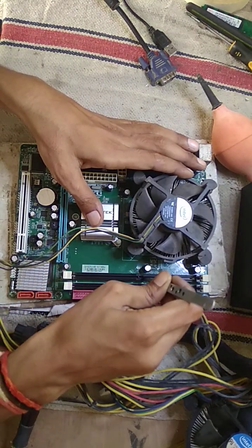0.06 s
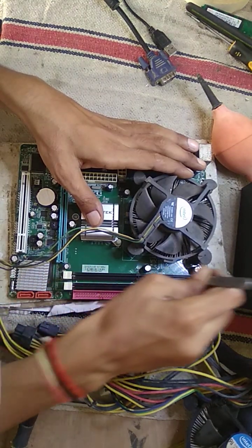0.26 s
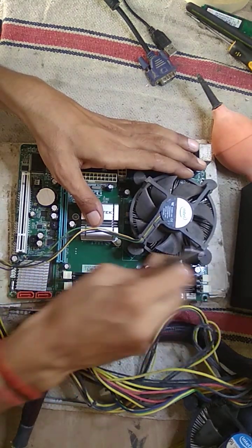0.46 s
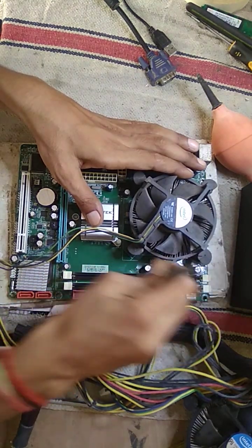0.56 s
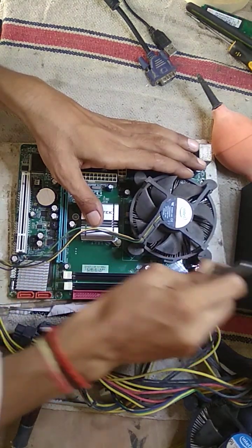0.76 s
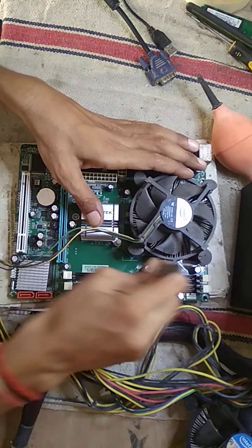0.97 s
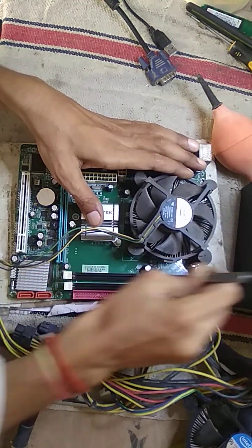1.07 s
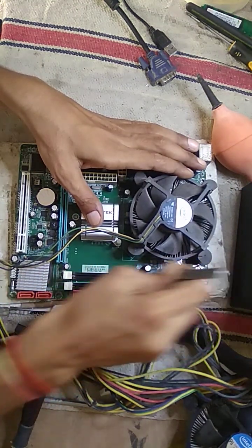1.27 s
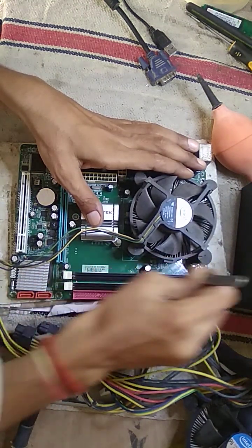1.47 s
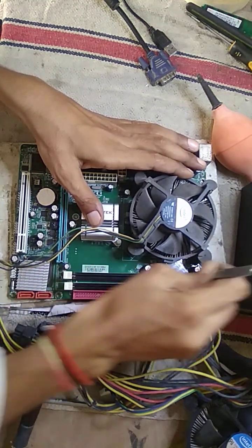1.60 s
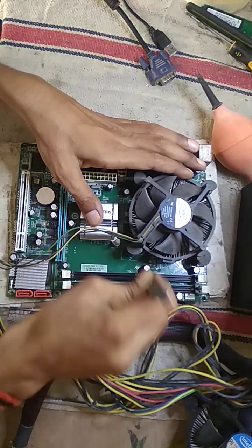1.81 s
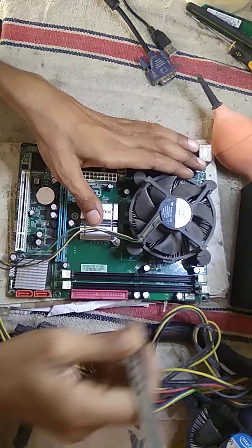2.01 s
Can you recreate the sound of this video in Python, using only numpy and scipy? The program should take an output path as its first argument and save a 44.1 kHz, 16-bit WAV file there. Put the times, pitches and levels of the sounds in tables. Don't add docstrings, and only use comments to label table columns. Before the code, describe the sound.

Faint touches, then quick alternating scrapes of metal on a plastic board slot, hissy and ticking, the board rattling on cloth; strokes stop and soft rumble remains. Small room, handheld stereo microphone above.

```python
import sys
import numpy as np
from scipy import signal
from scipy.fft import rfft, irfft
from scipy.io import wavfile

SR = 44100
rng = np.random.default_rng(int(sys.argv[2]) if len(sys.argv) > 2 else 0)


def field_ratio(decibels):
    return 10 ** (np.asarray(decibels, dtype=float) / 20)


def to_wav(s):
    ch = np.atleast_2d(s).T
    pcm = np.round(np.clip(ch, -1, 1) * 32767)
    wavfile.write(sys.argv[1], SR, pcm.astype(np.int16))


N = 90404


def at_hz(points, hz):
    p = np.array(points, float)
    return np.interp(np.log(np.maximum(hz, 1)), np.log(p[:, 0]), p[:, 1])


def over_time(points):
    return np.interp(np.arange(N) / SR, *np.transpose(points))


def rms_one(x):
    return x / np.sqrt(np.mean(x ** 2) + 1e-20)


def cut(x, hz, kind, order=4):
    return signal.sosfilt(signal.butter(order, hz, kind, fs=SR, output="sos"), x)


def colour(x, points):
    hz = np.fft.rfftfreq(N, 1 / SR)
    inside = (hz > points[0][0]) * (hz < points[-1][0])
    return irfft(rfft(x) * field_ratio(at_hz(points, hz)) * inside, N)


def drift(rate):
    r = np.exp(-2 * np.pi * rate / SR)
    return rms_one(signal.lfilter([1], [1, -2 * r, r * r], rng.standard_normal(N + SR))[SR:])


def ring(clicks, hz, t60):
    r, w = field_ratio(-60 / (t60 * SR)), 2 * np.pi * hz / SR
    return signal.lfilter([0, np.sin(w)], [1, -2 * r * np.cos(w), r * r], clicks + 1e-18)


def random_signs():
    return rng.choice([-1, 1], N)


def grains(rate, spread_db, clump_db):
    uneven = spread_db * np.minimum(rng.exponential(1, N), 3)
    size = field_ratio(uneven + clump_db * drift(90))
    return rms_one(size * random_signs() * (rng.random(N) < rate / SR))


def bumps():
    return grains(2000, 1, 1.5)


def pair_noise(spectrum, db):
    mid, side = colour(rng.standard_normal((2, N)), spectrum)
    pair = mid * field_ratio([[1.2], [-1.2]]) + 0.19 * side * [[1], [-1]]
    return field_ratio(db + 4 * drift(6.9)) * rms_one(pair)


# (t/s, level/dB)
ARM_LEVEL = [(0, -71.5), (.08, -62.5), (.11, -77), (.22, -66), (.35, -67.5), (.5, -67), (.9, -63),
             (1.02, -65.5), (1.44, -61.5), (1.53, -65.5), (1.72, -57), (1.83, -57.5), (2.01, -73),
             (2.05, -64.5)]
# (f/Hz, level/dB per Hz)
ARM_COLOUR = [(15, 11.5), (32, 5), (85, -0.5), (122, 5), (160, -10), (230, -18.5)]


def arm_rumble():
    return pair_noise(ARM_COLOUR, over_time(ARM_LEVEL))


# (f/Hz, level/dB per Hz)
AIR_COLOUR = [(150, -9), (250, -14.5), (390, -10), (600, -25), (1000, -22), (2500, -38.5), (11000, -45.5),
              (14000, -65)]


def room_air():
    return pair_noise(AIR_COLOUR, -74.5)


def earlier_stroke():
    fade = field_ratio(-260 * np.arange(N) / SR)
    return field_ratio(-62) * rms_one(colour(rng.standard_normal(N), RASP)) * fade


# (t/s, peak level/dB, f/Hz, t60/s)
HANDLING = [
    (.051, -52, 390, .05),
    (.131, -60, 10700, .025),
    (.133, -63, 11300, .03),
    (.135, -58, 380, .05),
    (.185, -64, 700, .04),
    (.335, -56, 1000, .02),
    (2.03, -57, 520, .04),
]


def handling():
    out = 0
    for s, db, hz, t60 in HANDLING:
        click = field_ratio(db) * (np.arange(N) == int(s * SR))
        out = out + cut(ring(click, hz, t60), [.75 * hz, 1.3 * hz], "band", order=1)
    return out


# (t/s, scraping speed as level/dB, pressure on the board/dB)
PUSHES = [
    [(.216, -62, -2), (.226, -32, 6), (.234, -31.5, 2), (.244, -23.5, -2), (.252, -42, -9), (.27, -44, -11)],
    [(.62, -66, 5), (.63, -37, -0.5), (.65, -28, 3), (.66, -36, -7), (.684, -26.5, -1.5), (.708, -31, -2),
     (.72, -26, -2), (.756, -24.5, -2.5), (.81, -53, -15)],
    [(1.044, -61, 14.5), (1.056, -30, 7), (1.076, -25.5, 0.5), (1.1, -24.5, -4.5), (1.156, -29.5, -4),
     (1.21, -68.5, -12.5)],
    [(1.45, -56.5, 12.5), (1.464, -31, 5), (1.476, -24.5, -1), (1.502, -25, 2.5), (1.542, -29.5, -12.5),
     (1.61, -62, 6.5)],
]
# (t/s, scraping speed as level/dB, pressure on the board/dB)
PULLS = [
    [(.422, -68, -12), (.432, -44.5, -6.5), (.45, -49, -17), (.458, -42, -5), (.474, -39, 2),
     (.515, -43.5, 4.5), (.542, -40.5, 2), (.575, -65.5, -2)],
    [(.85, -58, 8), (.86, -30, -10.5), (.894, -25, -6), (.926, -35.5, 1), (.958, -47.5, 8), (.975, -60, 0)],
    [(1.257, -64, 6), (1.271, -42.5, -5), (1.345, -36.5, -3), (1.364, -33.5, -2), (1.381, -42, 4),
     (1.41, -67, -1.5)],
    [(1.677, -71.5, -0.5), (1.685, -31.5, -12.5), (1.691, -29.5, -6), (1.719, -37.5, 1.5), (1.749, -36, -8),
     (1.783, -38, 4.5), (1.805, -58.5, -2), (1.89, -64, -6.5), (1.96, -87, -6)],
]
LANDINGS = [.2245, .427, .629, .856, 1.0545, 1.266, 1.461, 1.685]


def hand():
    lift_rate, land_rate, land_s = 920.5, 8000, .002
    t = np.arange(N) / SR
    speed, press, pull = np.zeros((3, N))
    strokes = [rows for pair in zip(PUSHES, PULLS) for rows in pair]
    for k, rows in enumerate(strokes):
        s, db, press_db = np.transpose(rows)
        lift = lift_rate * np.maximum(t - s[-1], 0)
        landing = land_rate * np.maximum(LANDINGS[k] - t, 0)
        lean_in = lift_rate * np.maximum(s[0] - t, 0)
        speed += field_ratio(np.interp(np.maximum(t, LANDINGS[k] + land_s), s, db) - lift - landing)
        press += field_ratio(np.interp(t, s, db + press_db) - lift - lean_in)
        pull[t > s[0]] = k % 2
    return speed, press, pull


# (t/s, length/s, f/Hz, level/dB)
FLEXES = [(0.21, 0.054, 520, -48.5), (0.47, 0.094, 537, -56), (0.63, 0.1, 590, -50), (0.73, 0.05, 432, -52),
          (0.879, 0.07, 658, -43.5), (1.04, 0.15, 532, -46), (1.045, 0.15, 612, -51),
          (1.06, 0.12, 270, -53), (1.302, 0.088, 590, -51), (1.484, 0.12, 526, -49.5),
          (1.479, 0.045, 252, -53.5), (1.686, 0.11, 622, -46), (0.21, 0.1, 627, -60.5),
          (1.2, 0.14, 614, -55.5), (.63, .14, 250, -64), (.9, .13, 300, -64.5), (0.64, .1, 793, -53.5),
          (1.79, 0.056, 503, -63), (.32, 0.052, 330, -67.5)]


def flexes():
    t, shaking, out = np.arange(N) / SR, bumps(), 0
    for s, length, hz, db in FLEXES:
        swell = np.sqrt(np.sin(np.pi * np.clip((t - s) / length, 0, 1)).clip(0))
        tone = cut(ring(shaking * swell, hz, .075), [0.78 * hz, 1.19 * hz], "band", order=1)
        out = out + field_ratio(db) * tone / np.sqrt(np.sum(tone ** 2) / (length * SR))
    return out


# (f/Hz, level pushing/dB, level pulling/dB)
BOARD_MODES = [(720, -9.5, -34.5), (858, -0.5, 1), (1006, -1.5, 6), (1120, 0, 2), (1275, 1, 8.5),
               (1411, 4.5, 3), (1590, 8, 3.5), (1648, -7.5, -9.5), (1712, -4, 2), (1938, -1.5, 3.5),
               (2378, -3.5, -0.5), (2737, -10, -1.5)]
# (t/s, favoured f/Hz)
SPAN = [(0.2, 1370), (0.29, 1410), (0.326, 1190), (0.524, 1120), (0.618, 1440), (0.672, 1330), (0.74, 1545),
        (0.79, 1400), (0.83, 960), (0.866, 1170), (0.998, 1270), (1.024, 1540), (1.228, 1090),
        (1.516, 1520), (1.634, 1200), (1.674, 1510), (1.752, 1190), (1.82, 1171)]


def board(press, pull):
    cycles = 46
    shaking, span, out = bumps() * press, over_time(SPAN), 0
    for k, (hz, push_db, pull_db) in enumerate(BOARD_MODES):
        t60 = cycles / hz
        place_db = 2 * drift(18.7)
        off_span_db = 3.5 * np.log2(hz / span) ** 2
        strength = field_ratio(np.where(pull, pull_db, push_db) + place_db - off_span_db)
        out = out + (-1) ** k * ring(shaking * strength, hz, t60) / np.sqrt(t60 * SR)
    return field_ratio(-1) * cut(out, 905, "high")


# (brightening at its start/dB, at its end/dB)
EDGE_TILT = [(-3, 0), (3, -3.5), (-1, -1.5), (1.5, -1), (-2, -1), (3.5, 5.5), (0, 6.5), (2, 0.5)]


def edge():
    s = np.add.outer(LANDINGS, [0, 0.15]).ravel()
    return field_ratio(np.interp(np.arange(N) / SR, s, np.ravel(EDGE_TILT)))


def shimmer(x):
    t = np.arange(SR // 20) / SR
    trail = rng.standard_normal(len(t)) * field_ratio(-60 * t / 0.09)
    trail = field_ratio(-0.5) * trail / np.sqrt(np.sum(trail ** 2)) + (t == 0)
    x = signal.lfilter(*signal.iirnotch(4270, 8, fs=SR), x)
    return signal.fftconvolve(x, trail)[:N] / np.sqrt(np.sum(trail ** 2))


# (f/Hz, level/dB per Hz)
RASP = [(1060, -34.5), (1800, -2.5), (3640, -6.5), (4260, 1.5), (4940, -1.5), (7860, -3), (13300, -8.5),
        (16000, 0.5), (16500, -36)]
# (f/Hz, width/Hz, level/dB)
TOOL_MODES = [(3580, 35, -3.5), (5300, 64, -29.5), (7190, 150, -2), (11140, 1300, 16.5), (10500, 92, -21),
              (13400, 200, 15.5), (15250, 600, -2)]


def tool(speed, pull):
    rasp_db, ring_db = -4, -2.5
    edge_hz, dull_hz, pull_dull_db = 7800, 4500, -1.5

    def patch(hz, db=0):
        return field_ratio(3.5 * drift(16.3) + db) * (edge() if hz > edge_hz else 1)

    bands = np.geomspace(1000, 17000, 25)
    patches = [patch(low, pull_dull_db * pull * (low < dull_hz)) for low in bands[:-1]]
    swells = [patch(mode[0]) for mode in TOOL_MODES]
    parts = []
    for _ in range(3):
        ticks = grains(3300, 5.5, 1.2)
        hiss, rasp, rings = rms_one(colour(ticks, RASP)), 0, 0
        for gain, low, high in zip(patches, bands, bands[1:]):
            rasp = rasp + gain * cut(hiss, [low, high], "band", order=2)
        for gain, (hz, width, db) in zip(swells, TOOL_MODES):
            t60 = np.log(1000) / (np.pi * width)
            tone = ring(gain * ticks * random_signs(), hz, t60)
            rings = rings + field_ratio(db) * np.sqrt(width) * cut(tone, 1.37 * hz, "high", order=2)
        parts.append(shimmer(speed * (field_ratio(rasp_db) * rms_one(rasp) + field_ratio(ring_db) * rms_one(rings))))
    return parts


# (t/s, peak level/dB)
KNOCKS = [(.2245, -29), (.234, -26), (.476, -34), (.506, -33), (.543, -27), (.642, -28), (.676, -30),
          (.718, -27), (.9, -27), (.951, -21.5), (1.03, -47), (1.058, -26), (1.309, -37), (1.359, -30),
          (1.376, -27), (1.473, -25), (1.768, -28), (1.782, -24)]


def knocks():
    out, clicks = 0, np.zeros(N)
    s, db = np.transpose(KNOCKS)
    clicks[(s * SR).astype(int)] = field_ratio(db)
    for hz in (1120, 1380):
        out = out + 1.6 * cut(ring(clicks, hz, .007), [.7 * hz, 1.5 * hz], "band", order=2)
    return out


# (t/s, peak level/dB)
SNAGS = [(.2245, -26), (.23, -26), (.2382, -21), (.2415, -21), (.4585, -25), (.6368, -24), (.650, -20),
         (.670, -22), (.7145, -22), (.862, -24), (.877, -23), (.889, -21), (.908, -23), (1.063, -22),
         (1.3605, -23), (1.448, -44), (1.4635, -26), (1.4725, -21), (1.539, -22), (1.693, -25)]


def snags():
    t, bursts = np.arange(N) / SR, 0
    for s, db in SNAGS:
        bursts = bursts + field_ratio(db) * np.exp(-np.maximum(t - s, 0) / .002) * (t > s)
    return cut(0.66 * bursts * rng.standard_normal(N), 4500, "high", order=2)


# (f/Hz, left minus right level/dB)
BALANCE = [(110, -2), (1290, -0.5), (2380, -5), (4400, 5), (8120, -5.5), (13000, -1)]
# (f/Hz, share)
LIKENESS = [(300, 0.94), (700, 1), (1200, 0.99), (2500, 0.67), (5000, 0.28), (14000, 0.33)]
# (f/Hz, phase/rad)
LEAD = [(100, 0), (1000, -.1), (3000, -.5), (5300, -3.0), (6400, -6.2), (10000, -7.9), (12500, -6.2),
        (16500, -3.1)]


def ports(alike, left, right):
    hz = np.fft.rfftfreq(N, 1 / SR)
    share = np.clip(at_hz(LIKENESS, hz), 0, 1)
    turn = field_ratio(at_hz(BALANCE, hz) / 2) * np.exp(.5j * at_hz(LEAD, hz))
    both = np.sqrt(share) * rfft(alike) + np.sqrt(1 - share) * rfft([left, right])
    return irfft(both * [turn, 1 / turn], N)


ROOM_DB = -12.5
# (f/Hz, t60/s)
ROOM_T60 = [(300, 0.32), (1500, 0.27), (6000, 0.29), (15000, 0.26)]


def room(x):
    t, tail = np.arange(SR // 2) / SR, 0
    edges = 150 * 2 ** np.arange(0, 7.1)
    for low, high in zip(edges, edges[1:]):
        noise = cut(rng.standard_normal((2, len(t))), [low, high], "band", order=2)
        early = field_ratio(-60 * t / at_hz(ROOM_T60, np.sqrt(low * high)))
        late = field_ratio(-25 - 60 * t / 0.65) / (1 + (low / 5000) ** 2)
        tail = tail + noise * (early + late) * (t > .004)
    tail = tail / np.sqrt(np.sum(tail ** 2) / 2)
    return field_ratio(ROOM_DB) * signal.fftconvolve(tail, x[None])[:, :N]


def scene():
    speed, press, pull = hand()
    alike, left, right = tool(speed, pull)
    body = board(press, pull) + flexes() + knocks() + snags() + handling()
    direct = ports(alike + body, left + np.roll(body, 40), right - np.roll(body, 25))
    background = arm_rumble() + room_air()
    return direct + room(alike + body) + field_ratio(ROOM_DB) * earlier_stroke() + background


def band_limit(x):
    return signal.sosfilt(signal.butter(12, 16990, fs=SR, output="sos"), x)


def record(dry):
    mix = signal.sosfilt(signal.cheby2(14, 60, 1.03 * 15800, fs=SR, output="sos"), dry)
    return band_limit(mix)


dry = scene()
out = record(dry)
to_wav(out)
```